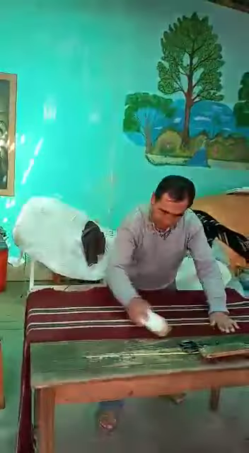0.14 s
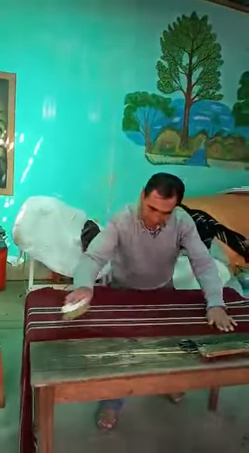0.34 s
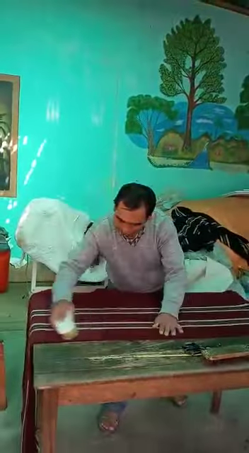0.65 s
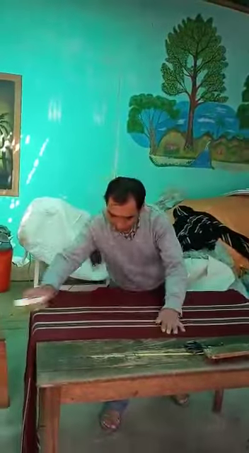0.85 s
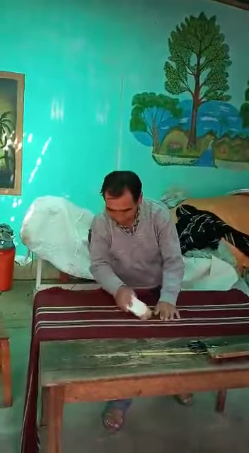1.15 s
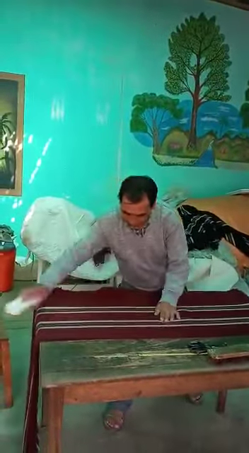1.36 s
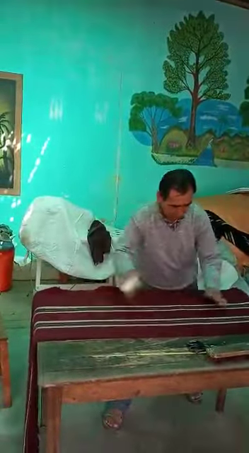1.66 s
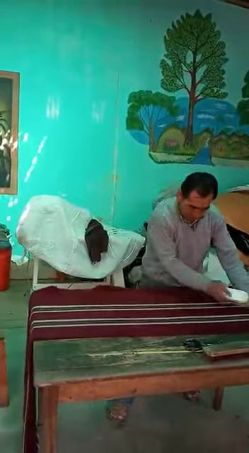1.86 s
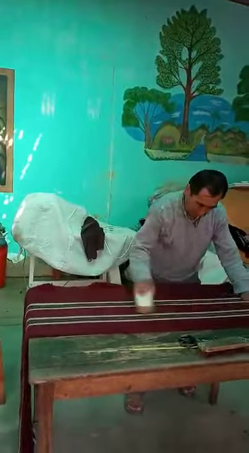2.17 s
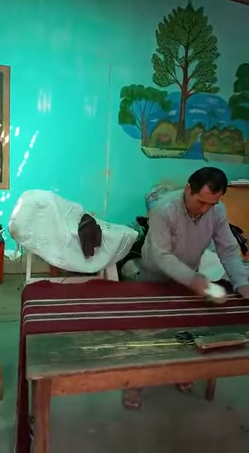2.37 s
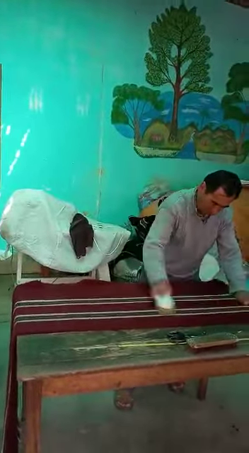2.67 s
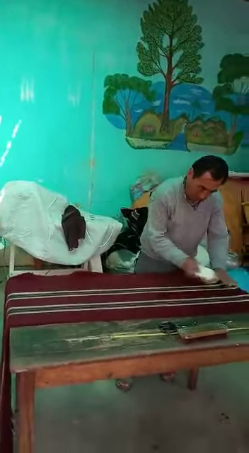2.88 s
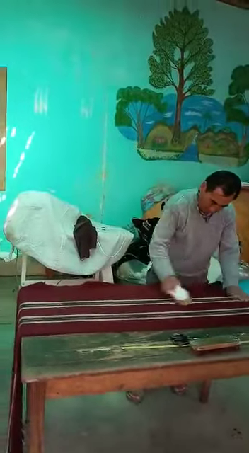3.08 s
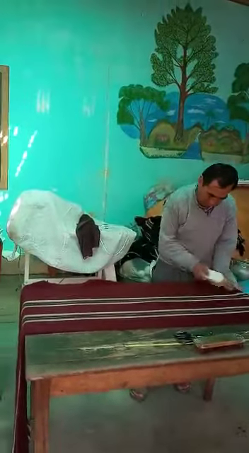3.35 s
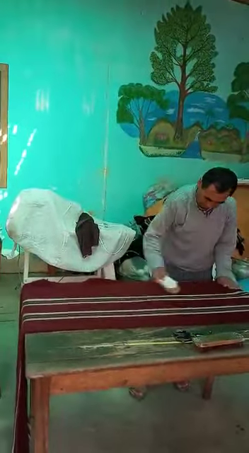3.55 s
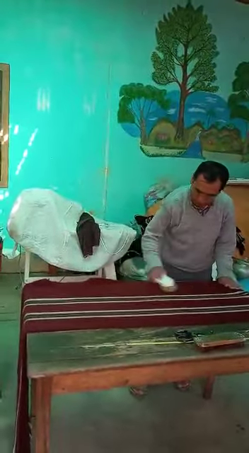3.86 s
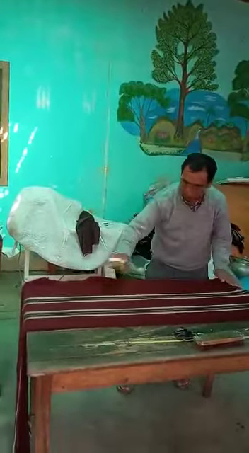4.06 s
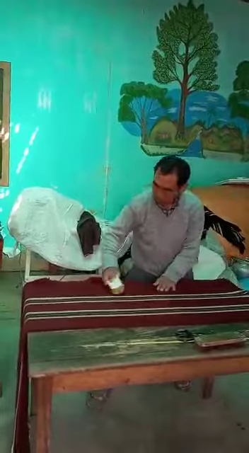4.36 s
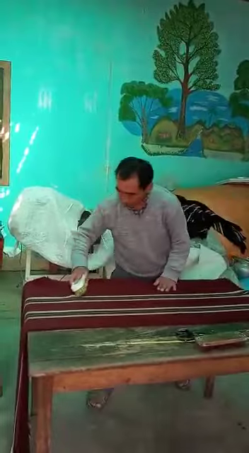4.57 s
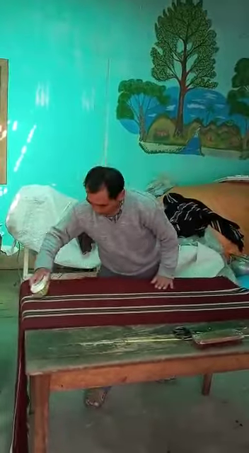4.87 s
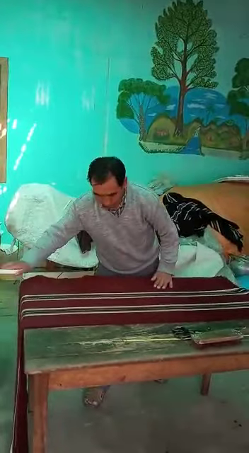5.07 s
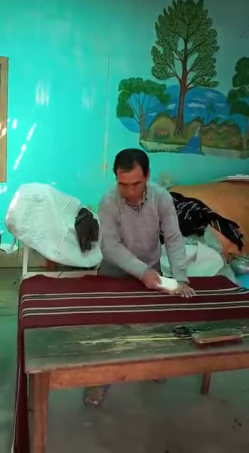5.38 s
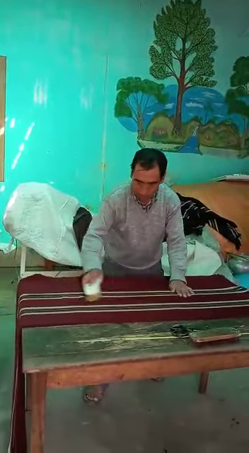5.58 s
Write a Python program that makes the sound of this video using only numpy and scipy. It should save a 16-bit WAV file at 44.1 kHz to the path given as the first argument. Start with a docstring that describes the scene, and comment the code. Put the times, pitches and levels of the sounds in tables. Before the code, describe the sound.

A hand tool sweeps back and forth over woollen cloth on a wooden table, with rasping swishes, crisp flicks, padded bumps and one hard knock.

```python
"""The short, faint end of a swish opens the scene, in faint room air with a low hum that comes and goes.
A hand brush or similar hand tool smooths woollen cloth on a wooden table in a small plastered room: each push
is filtered noise in four parts, from drag to fizz. Crisp flicks are noise bursts that jolt the tool's ringing body.
Two faint squeaks are wavering sines; low padded bumps ring damped modes of the table.
One hard knock on the wood, and later a much softer one, pairs a crack with an opposed boom."""
import sys
import numpy as np
from scipy import signal
from scipy.fft import rfft, irfft
from scipy.io import wavfile

SR = 44100
rng = np.random.default_rng(int(sys.argv[2]) if len(sys.argv) > 2 else 0)


def master(y):
    """Save y as 16-bit WAV."""
    cut = np.clip(np.atleast_2d(y).T, -1, 1)
    pcm = np.round(cut * 32767)  # scale
    wavfile.write(sys.argv[1], SR, pcm.astype(np.int16))


N = 252461
TIME = np.arange(N) / SR
LEFT_LAG_S = 36 / 44100   # direct sound reaches the left side this much later


def from_db(db):
    """Decibels to gain."""
    return 10 ** (np.asarray(db) / 20)


def rms_one(x):
    """Scale to unit power."""
    return x / np.sqrt(np.mean(x ** 2) + 1e-20)


def pan(left_db):
    """Left and right gains, left_db apart, of mean power one."""
    gains = from_db(np.array([[.5], [-.5]]) * left_db)
    return gains / np.sqrt(np.mean(gains ** 2, axis=0))


def drift(rate_hz):
    """Smooth random wander of spread one, drawn rate_hz times a second and joined by lines."""
    knots = rng.standard_normal(N)
    return rms_one(np.interp(TIME * rate_hz, np.arange(N), knots))


def filtered(x, order, hz, kind="low"):
    """Butterworth filter."""
    return signal.sosfilt(signal.butter(order, hz, kind, fs=SR, output="sos"), x)


def coloured(x, spectrum):
    """Give a steady noise a spectrum, drawn over log frequency; rms one."""
    hz, db = np.transpose(spectrum)
    bins = np.maximum(np.fft.rfftfreq(2 ** 18, 1 / SR), 1)
    gain = from_db(np.interp(np.log(bins), np.log(hz), db, left=-90, right=-90))
    return rms_one(irfft(rfft(x, 2 ** 18) * gain)[..., :N])


def ring(x, hz, t60_s):
    """A damped resonator: a unit click sets a sine of height one ringing."""
    radius = from_db(-60 / (t60_s * SR))
    angle = 2 * np.pi * hz / SR
    return signal.lfilter([0, np.sin(angle)], [1, -2 * radius * np.cos(angle), radius * radius], x + 1e-18)


def resonate(x, hz, t60_s):
    """A resonance with a gain of one at its top."""
    return 2 * (1 - from_db(-60 / (t60_s * SR))) * ring(x, hz, t60_s)


def room(x, wet_db, t60_s):
    """Direct sound, late on the left, plus separate decaying noise reflections for each side."""
    t = TIME[:len(x)]
    age = t[:SR // 2]
    echoes = rng.standard_normal((2, len(age))) * from_db(-60 * age / t60_s) * (age > .001)
    echoes *= from_db(wet_db) / np.sqrt(np.sum(echoes ** 2, axis=1, keepdims=True))
    direct = np.array([np.interp(t - LEFT_LAG_S, t, x, left=0), x])
    wet = signal.fftconvolve(x[None], echoes, axes=1)[:, :len(x)]
    return (direct + wet) / np.sqrt(1 + from_db(wet_db) ** 2)


def travelling(x, wet_db, t60_s, count=36):
    """The pattern of near reflections changes as the tool moves from place to place."""
    out, hop = np.zeros((2, N + SR)), N // count + 1
    for start in range(-hop, N, hop):
        at = np.arange(max(start, 0), min(start + 2 * hop, N))
        crossfade = np.sin(np.pi * (at - start) / (2 * hop)) ** 2
        piece = np.pad(x[at] * crossfade, (0, SR // 8))
        out[:, at[0]:at[0] + len(piece)] += room(piece, wet_db, t60_s)
    return out[:, :N]


def fibres(spectrum, grain_db):
    """Countless fibres slip in clumps of about a millisecond."""
    return coloured(rng.standard_normal(N) * from_db(grain_db * drift(1100)), spectrum)


def rubbing(spectrum, gain, grain_db, diffuse_db, near_db, t60_s, colour=lambda x: x):
    """One part of a push: the nearby sound plus a diffuse layer, unrelated at the two sides."""
    near = travelling(gain * colour(fibres(spectrum, grain_db)), near_db, t60_s)
    diffuse = gain * colour(coloured(rng.standard_normal((2, N)), spectrum))
    return (near + from_db(diffuse_db) * diffuse) / np.sqrt(1 + from_db(diffuse_db) ** 2)


# How drag, rubbing, hiss and fizz behave in every push, one row each:
# first_touch_db, hold_drift [dB per s], release [dB per s]
PART_SHAPES = [(-10, -75, 134), (-12, 1, 177), (-12, -1, 233), (-15.5, -6, 292)]
TOUCH_S = 0.013   # time constant of the rise as the sole meets the cloth


def push(age, attack_s, hold_s, swell_db):
    """Gains of the four parts in one push: the sole touches, takes hold, slides on and runs out."""
    touch_db, drift_db, release_db = np.transpose(PART_SHAPES)[..., None]
    gripped = np.clip(age / attack_s, 0, 1)
    from_middle = np.clip(age - attack_s, 0, hold_s) - hold_s / 2
    run_out = np.maximum(age - attack_s - hold_s, 0)
    db = touch_db * (1 - gripped) + (swell_db / hold_s + drift_db) * from_middle - release_db * run_out
    return from_db(db) * np.exp(np.minimum(age, 0) / TOUCH_S)


# Pushes of the tool over the cloth, part levels before the mix trims, place before each part's width:
# start_s, attack_s, hold_s, hold_swell_db, drag_db, rub_db, hiss_db, fizz_db,
# rub_centre_hz, place_db [left minus right]
PUSHES = [(0.0, 0.0017, 0.0032, -6.5, -73, -47, -54, -67, 1750, -1),
          (0.284, 0.06, 0.081, -3.5, -44.5, -39.5, -43, -52.5, 1470, 1.5),
          (0.568, 0.017, 0.03, 0, -59.5, -69, -77, -71, 1470, -9),
          (0.682, 0.031, 0.016, -2, -55, -58.5, -56.5, -53.5, 1550, 2),
          (0.838, 0.056, 0.17, -3.5, -49.5, -45, -48, -57, 1780, 1),
          (1.306, 0.067, 0.12, 1, -92, -81, -73.5, -102, 2000, -3),
          (1.546, 0.031, 0.13, 4, -72, -34, -36.5, -53, 2200, 2),
          (1.701, 0.016, 0.12, 10.5, -57, -46, -51, -58.5, 1850, -0.5),
          (2.223, 0.041, 0.092, 2.5, -50, -43, -50, -56.5, 1760, 3),
          (2.433, 0.1, 0.062, 0.5, -52, -37.5, -34.5, -49, 2180, 3.5),
          (2.589, 0.073, 0.042, 0, -46, -37, -46.5, -60, 1860, 14),
          (2.73, 0.031, 0.027, 1, -45, -34, -42.5, -51, 1640, 13.5),
          (3.106, 0.052, 0.13, 4, -59, -43.5, -48, -58, 1400, 1),
          (3.519, 0.033, 0.1, 2, -53, -44.5, -47.5, -59, 1650, 3),
          (3.731, 0.02, 0.01, -1.5, -56, -45.5, -53.5, -65, 1420, 2),
          (4.024, 0.094, 0.13, -5, -53, -48, -54, -69.5, 1660, 3),
          (4.182, 0.025, 0.37, -4.5, -73, -57.5, -63, -75, 1720, 5),
          (4.498, 0.1, 0.054, 4, -66.5, -47, -51.5, -62.5, 1630, 1),
          (4.804, 0.048, 0.053, -4, -67.5, -50.5, -58.5, -79, 2150, 5.5),
          (5.144, 0.031, 0.033, -4.5, -37, -34.5, -40, -45.5, 1250, 2.5),
          (5.198, 0.033, 0.074, -3, -47.5, -42, -48.5, -57, 1430, 3.5),
          (5.334, 0.021, 0.036, -1.5, -55, -53.5, -63.5, -79, 1720, 5),
          (5.532, 0.016, 0.15, 5.5, -53, -49, -52, -62, 1620, 3.5)]
GLIDE_OCTAVES_PER_S = 0.43   # the rubbing rises as a push gathers speed
# As rubbing falls below idle_db, its pitch and place settle to idle_hz and idle_place_db
IDLE_DB, IDLE_HZ, IDLE_PLACE_DB = -70, 1510, 0.5


def push_gains():
    """Gains of the four parts over all pushes; pitch and place lean to the push that rubs loudest."""
    power, total = np.zeros((4, N)), np.full(N, from_db(IDLE_DB) ** 2)
    centre, place = IDLE_HZ * total, IDLE_PLACE_DB * total
    for start_s, attack_s, hold_s, swell_db, *levels_db, hz, place_db in PUSHES:
        at = np.flatnonzero((TIME > start_s - .1) & (TIME < start_s + 1))
        age, length_s = TIME[at] - start_s, attack_s + hold_s
        parts = (from_db(levels_db)[:, None] * push(age, attack_s, hold_s, swell_db)) ** 2
        power[:, at] = np.maximum(power[:, at], parts)
        rub_power = parts[1]
        glide_octaves = GLIDE_OCTAVES_PER_S * (np.clip(age, 0, length_s) - length_s / 2)
        total[at] += rub_power
        centre[at] += rub_power * hz * 2 ** glide_octaves
        place[at] += rub_power * place_db
    return np.sqrt(power), centre / total, place / total


# The nap catches and lets go; levels before the mix trims:
# start_s, level_db, rub_db [against level], fizz_db [against level]
NAP_FLICKS = [(0.0996, -44.5, -7.5, -19), (0.31, -25, -18, -16), (0.5573, -48.5, -1, -12.5),
              (0.597, -44.5, -9, -27), (0.6804, -33, -16, -13.5), (0.814, -33.5, -14.5, -18.5),
              (0.8974, -28.5, -30, -18.5), (1.546, -42, 2, -43), (1.691, -31.5, -4, -14.5),
              (2.021, -39.5, -2, -32), (2.178, -47, -10, -19.5), (2.2325, -37.5, -9, -19),
              (2.565, -37, -15, -4), (3.1096, -53.5, 7, -29), (3.1386, -38, -9.5, -27),
              (3.522, -38.5, -8.5, -18), (3.748, -43, -2, -9.5), (4.017, -31, -12.5, -23.5),
              (4.0616, -34.5, -9.5, -31), (4.814, -36.5, -11, -15.5), (5.1415, -24.5, -15, -24.5)]
FLICK_T60_S = 0.2


def flick_gains(rise_s=0.00046, snap_db=3.5, snap_s=0.00094):
    """A tuft of fibres lets go at once: a snap, then a burst that thins out, in all four parts."""
    gains = np.zeros((4, N))
    for start_s, db, rub_db, fizz_db in NAP_FLICKS:
        at = slice(round(start_s * SR), round(start_s * SR) + SR // 2)
        age = TIME[at] - TIME[at][0]
        thinning = from_db(-60 * age / FLICK_T60_S)
        snap = from_db(snap_db) * np.exp(-age / snap_s)
        burst = (thinning + snap) * (1 - np.exp(-age / rise_s))
        parts_db = db + np.array([[-27], [rub_db], [-11], [fizz_db]])   # drag, rub, hiss, fizz
        gains[:, at] += from_db(parts_db) * burst
    return gains


def sliding(x, centre_hz, lift_db=23.5, octaves=0.7):
    """A broad hump in the rubbing follows the speed of the slide."""
    edges_hz = np.geomspace(1100, 3000, num=5)
    below = [signal.sosfiltfilt(signal.butter(3, hz, fs=SR, output="sos"), x) for hz in edges_hz]
    bands = np.diff([0 * x, *below, x], axis=0)
    middles_hz = np.geomspace(970, 3400, num=6)[:, None]
    distance = np.log2(middles_hz / centre_hz) / octaves
    gains = from_db(lift_db * np.exp(-.5 * distance ** 2))
    gains /= np.sqrt(np.mean(gains ** 2, axis=0))
    return sum(gain * band for gain, band in zip(gains, bands))


def snaps(per_s=70, spread_db=-1.0):
    """Single threads catch on the sole and snap back as sparse, band-limited clicks."""
    sizes = from_db(spread_db * np.minimum(rng.exponential(1, N), 3)) * rng.choice([-1, 1], N)
    clicks = sizes * (rng.random(N) < per_s / SR)
    return filtered(clicks + 1e-18, 2, [1100, 8500], "band")


# Modes of the wooden table: pitch_hz, level_db [bumps only], t60_s
TABLE_MODES = [(118.6, -6.5, 0.14), (147.8, -17.5, 0.37), (206, -24.5, 0.06), (269.1, -5.5, 0.1),
               (308, -12, 0.43), (473, -73, 0.28)]


def droning(x, drag, board_db=13.0, heavy_db=-48):
    """The drag keeps table modes going; heavy drag on the right side also sets one board singing."""
    modes = sum(resonate(x, hz, t60_s) for hz, db, t60_s in TABLE_MODES[2:])
    pressed = drag ** 2 / (drag ** 2 + from_db(heavy_db) ** 2)
    board = room(resonate(x[1] * pressed, 724, 0.2), wet_db=-2, t60_s=.06)
    return x + modes + from_db(board_db) * board


# Resonances of the tool's body: pitch_hz, level_db [before its wander], t60_s
BODY_MODES = [(1288, -3, 0.2), (1506, -8.5, 0.046), (1850, -25, 0.75), (2121, -7, 0.18), (2385, -10, 0.03),
              (2810, -84, 0.37), (3510, -33, 0.11), (3810, -3.5, 0.72), (4340, -70, 0.043),
              (5060, -12, 0.36), (6280, -9, 0.039), (6700, -33, 0.16), (6900, -15, 0.11), (7830, -3, 0.25)]


def body(x):
    """The tool rings along; the shifting grip favours now one resonance, now another."""
    out = .85 * x
    for hz, db, t60_s in BODY_MODES:
        grip_db = 6 * np.tanh(drift(8))
        out = out + resonate(x * from_db(db + grip_db), hz, t60_s)
    return out


# Noise colours of the four parts of a push, low to high: pitch_hz, density_db [relative, per Hz]
DRAG_COLOUR = [(60, -17), (110, -5.5), (170, -9.5), (280, 3.5), (450, 0), (600, -0.5), (730, 2.5),
               (900, -5.5), (1300, -17), (2500, -51)]
RUB_COLOUR = [(550, -20), (850, 0), (1100, 0.5), (1500, -1), (2200, -2.5), (2800, 0.5), (3500, -3),
              (5000, -7)]
HISS_COLOUR = [(2400, -9.5), (3600, -3), (4700, -5.5), (6600, -1.5), (7700, -3), (8700, -12), (11000, -56)]
FIZZ_COLOUR = [(6500, -15), (8500, 2), (9800, 1), (11300, 2.5), (12600, -7), (14000, -8.5), (15200, -1.5),
               (16000, -4)]


def swishes():
    """The sole slides over the wool, juddering a little, and the table drones under it."""
    gains, centre_hz, place_db = push_gains()
    judder = from_db(0.27 * drift(90))
    drag, rub, hiss, fizz = np.hypot(gains, flick_gains()) * judder
    low = rubbing(DRAG_COLOUR, from_db(4.0) * drag, grain_db=4.0, diffuse_db=-5.5, near_db=-0.5, t60_s=0.1)
    middle = rubbing(RUB_COLOUR, from_db(1.0) * rub, grain_db=4.5, diffuse_db=-0.5, near_db=11.0,
                     t60_s=0.11, colour=lambda x: sliding(x, centre_hz))
    high = rubbing(HISS_COLOUR, from_db(1.5) * hiss, grain_db=3.0, diffuse_db=-4.4, near_db=4.0, t60_s=0.05)
    high = high + from_db(4) * room(snaps() * np.hypot(rub, hiss), wet_db=3, t60_s=0.14)
    top = rubbing(FIZZ_COLOUR, from_db(1.0) * fizz, grain_db=3.0, diffuse_db=-7.0, near_db=8.0, t60_s=0.045)
    drone = droning(low * pan(place_db), drag)
    tool = body(middle * pan(6.1 + 0.59 * place_db) + high * pan(8.0))
    return drone + tool + top * pan(-4.0 + 0.13 * place_db)


# Colour of the still room: pitch_hz, density_db [relative, per Hz]
AIR_COLOUR = [(15, -47), (25, -1), (127, 10), (301, 2.5), (545, -7), (1440, -8), (1700, -7.5), (4250, -13),
              (7510, -21), (9070, -30), (11000, -26), (13600, -31), (16000, -17)]
# A low hum swells and fades: peak_s, half_width_s, level_db [before its wavering]
HUM_SWELL_TIMES = [(4.32, 0.15, -58.5), (4.97, 0.08, -55), (5.44, 0.035, -71), (5.69, 0.11, -49.5)]
AIR_DB, HUM_HZ = -65.5, 114


def background():
    """Still air as noise, alike on both sides in the bass, and a hum wavering in level and pitch."""
    shared = filtered(rng.standard_normal(N), 1, 350)
    own = filtered(rng.standard_normal((2, N)), 1, 350, "high")
    air = from_db(AIR_DB) * coloured(shared + own, AIR_COLOUR)
    swell = sum(from_db(db) / (1 + ((TIME - peak_s) / width_s) ** 2) for peak_s, width_s, db in HUM_SWELL_TIMES)
    level = swell * from_db(1.8 * drift(23))
    pitch_hz = HUM_HZ * (1 + 0.0274 * drift(12))
    hum = level * np.sin(2 * np.pi * np.cumsum(pitch_hz) / SR)
    return (air + hum) * pan(4.8)


def clinks(strike_db=-9.5):
    """Each flick jolts the tool's resonances, damped by the hand, each with a strength of its own."""
    at = [round(row[0] * SR) for row in NAP_FLICKS]
    jolt_db = np.array([db + rub_db for _, db, rub_db, _ in NAP_FLICKS])   # follows the rubbing
    chance_db = 4 * np.tanh(rng.standard_normal((len(at), len(BODY_MODES))))
    out = np.zeros(N)
    for k, (hz, db, t60_s) in enumerate(BODY_MODES):
        jolts = np.zeros(N)
        jolts[at] = (-1) ** k * from_db(jolt_db + strike_db + db + chance_db[:, k])
        out += ring(jolts, hz, min(t60_s, .13))
    return room(out, wet_db=-1.0, t60_s=0.17) * pan(6.0)


# Faint squeaks: start_s, length_s, pitch_hz [before waver], level_db [before the room]
SQUEAK_TONES = [(0.157, 0.071, 1540, -61), (3.881, 0.11, 1870, -65.5)]


def squeaks(waver=0.04):
    """Brief stick-slip tones, made as swelling sines unsteady in pitch."""
    out, pitch = np.zeros(N), 1 + waver * drift(230)
    for start_s, length_s, hz, db in SQUEAK_TONES:
        progress = np.clip((TIME - start_s) / length_s, 0, 1)
        swell = np.sqrt(np.abs(np.sin(np.pi * progress)))
        out += from_db(db) * swell * np.sin(2 * np.pi * np.cumsum(hz * pitch) / SR)
    return room(out, wet_db=15, t60_s=.25) * pan(13.0)


# Low bumps: the tool lands on the padded top, or judders as it drags:
# start_s, level_db [before filters and room], pitch_hz, table_ring_db [against level]
BUMPS = [(0.254, -27.5, 169, 5), (0.345, -33, 251, -8.5), (0.563, -47, 314, -9), (0.694, -45.5, 320, 2),
         (0.812, -22.5, 143, -7), (0.878, -36.5, 231, 7.5), (1.562, -39.5, 258, -2),
         (2.181, -33.5, 178, -3.5), (2.199, -28, 163, -3), (2.255, -33, 237, -7), (2.631, -30.5, 246, -3),
         (3.091, -31, 240, -1.5), (3.504, -38.5, 157, -8), (4.018, -23, 195, 0), (5.083, -23, 205, -7),
         (5.166, -38, 174, -30), (5.52, -22, 137, -19)]
SETTLE_S, SETTLE_DB = 0.02712, -8   # a second, softer bump follows each one


def thuds(thud_t60_s=0.052, low_cut_hz=100, padding_hz=420):
    """The cloth softens each bump to a short thud, which sets the table ringing."""
    out, blows = np.zeros((2, N))
    for start_s, db, hz, ring_db in BUMPS:
        blow = np.zeros(N)
        blow[round(start_s * SR)] = from_db(db)
        blow[round((start_s + SETTLE_S) * SR)] = from_db(db + SETTLE_DB)
        out += ring(blow, hz, thud_t60_s)
        blows += blow * from_db(ring_db)
    for k, (hz, db, t60_s) in enumerate(TABLE_MODES):
        out += (-1) ** k * from_db(db) * ring(blows, hz, t60_s)
    out = filtered(out, 4, low_cut_hz, "high")
    out = filtered(out, 2, padding_hz)
    return room(out, wet_db=-11, t60_s=.35) * pan(3.2)


# Knocks on the wood: start_s, crack_db [drive of the modes], boom_db [against the crack]
KNOCK_HITS = [(2.4736, -5.5, -6.5), (2.9154, -32, -7)]
# What a knock rings with: pitch_hz, level_db, t60_s
WOOD_MODES = [(250, -11.5, 0.054), (340, 2, 0.017), (620, -68, 0.0021), (1700, -12, 0.0034),
              (2300, -9.5, 0.005), (5200, -18, 0.0017)]


def knocks(low_cut_hz=150):
    """A hard edge meets the wood: a crack and a heavily damped boom that swings against it."""
    crack, boom = np.zeros((2, N))
    for start_s, db, boom_db in KNOCK_HITS:
        crack[round(start_s * SR)] = from_db(db)
        boom[round(start_s * SR)] = -from_db(db + boom_db)
    out = sum(from_db(db) * ring(crack if hz > 1000 else boom, hz, t60_s) for hz, db, t60_s in WOOD_MODES)
    out = filtered(out, 2, low_cut_hz, "high")   # a small board radiates no deep bass
    return room(out, wet_db=-20, t60_s=.08) * pan(25.0)


def scene():
    """Everything at the table, and the room around it."""
    return swishes() + background() + clinks() + squeaks() + thuds() + knocks()


def record(dry):
    """The top is cut steeply above 16.2 kHz."""
    return signal.sosfilt(signal.ellip(10, .1, 80, 16200, fs=SR, output="sos"), dry)


dry = scene()
out = record(dry)
master(out)
```